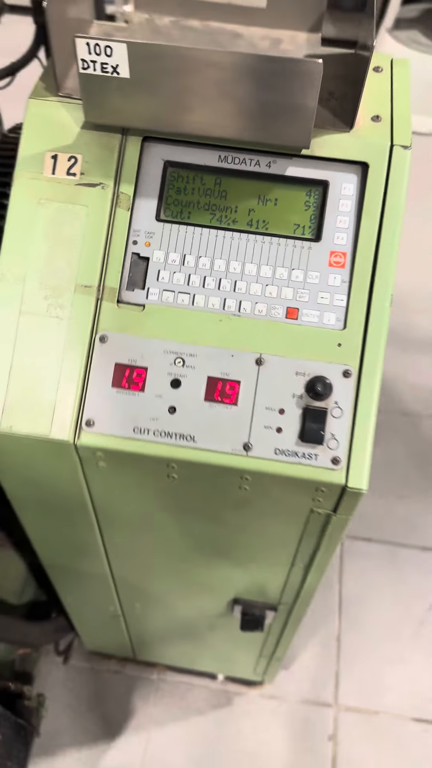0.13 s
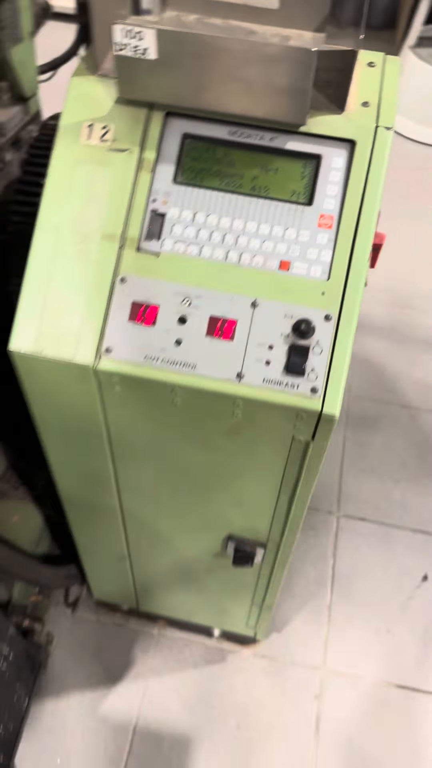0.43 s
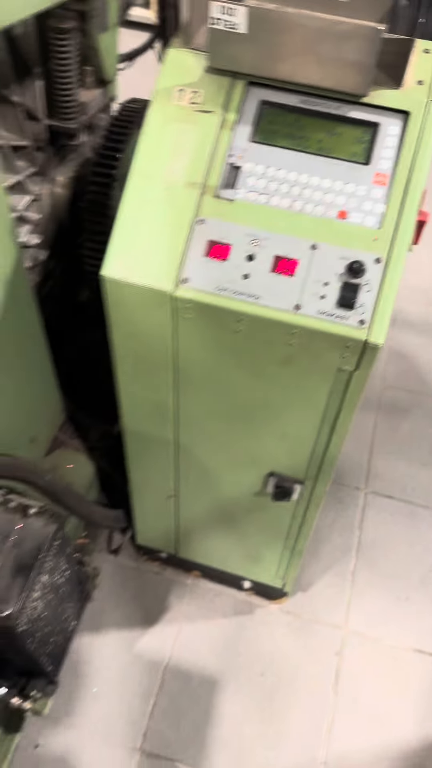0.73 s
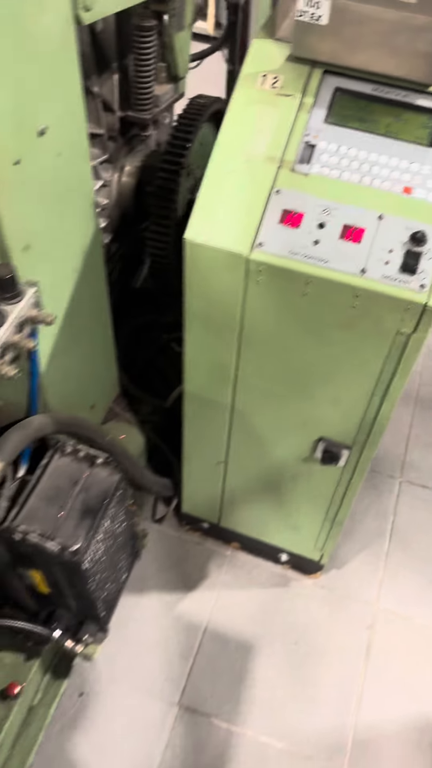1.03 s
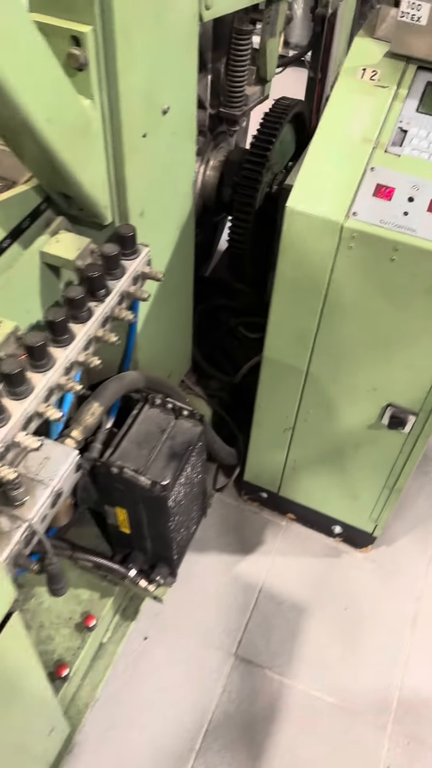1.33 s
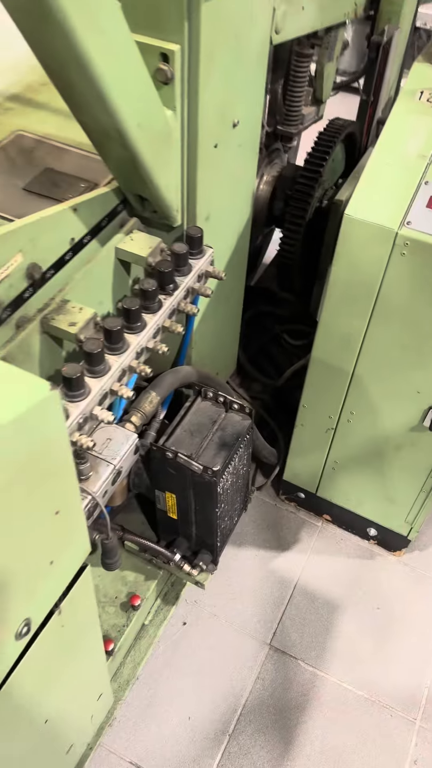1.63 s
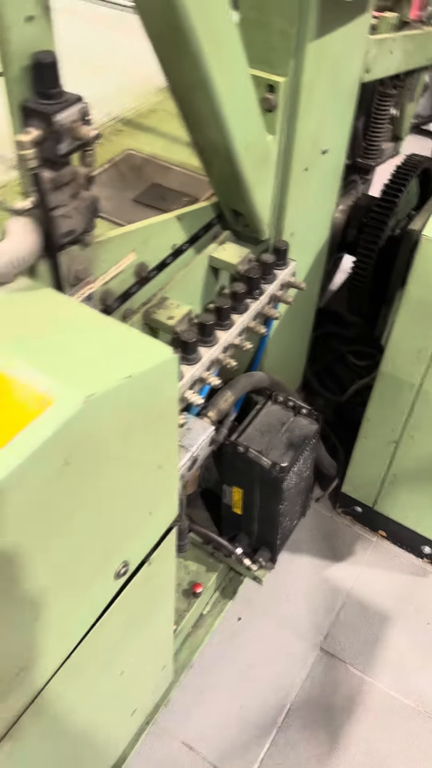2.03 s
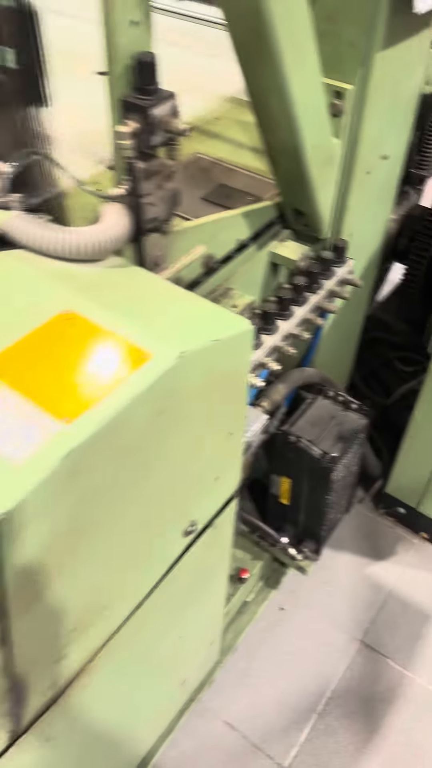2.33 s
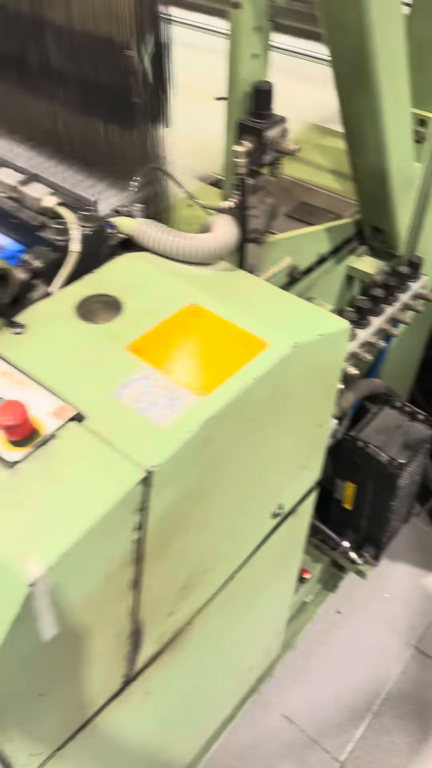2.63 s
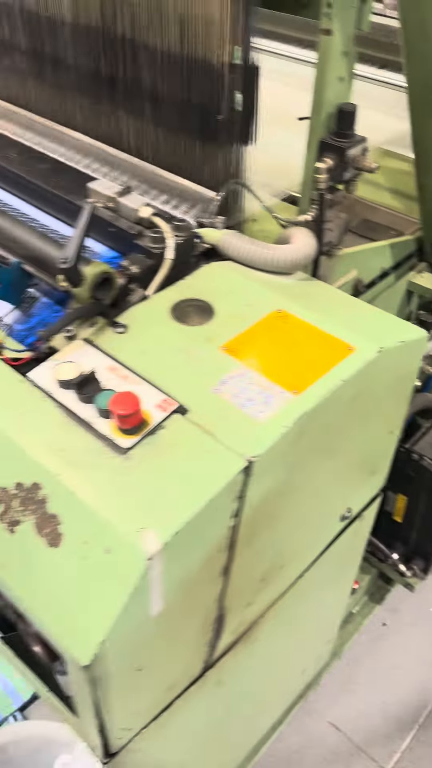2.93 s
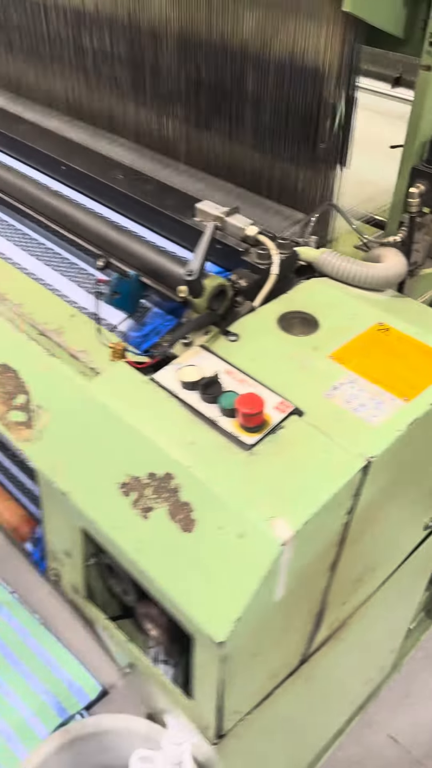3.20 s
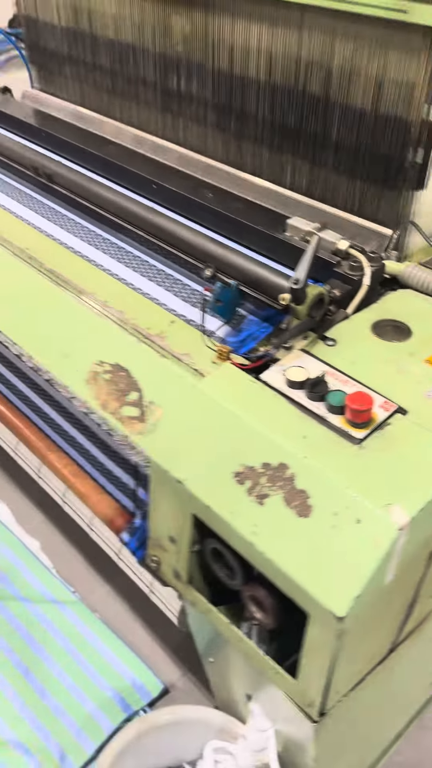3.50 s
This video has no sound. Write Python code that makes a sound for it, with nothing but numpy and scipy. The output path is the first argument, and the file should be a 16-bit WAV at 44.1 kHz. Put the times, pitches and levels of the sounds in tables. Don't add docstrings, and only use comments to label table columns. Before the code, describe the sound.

An air-jet weaving loom beats over ten times a second, each beat a hissing puff and metallic clack, over gear hum and hall noise, heard close on a phone carried past.

```python
import sys
import numpy as np
from scipy import signal
from scipy.fft import rfft, irfft, next_fast_len
from scipy.io import wavfile
from scipy.ndimage import uniform_filter1d, map_coordinates

SR = 44100
rng = np.random.default_rng(int(sys.argv[2]) if len(sys.argv) > 2 else 0)


def generate_wav(signal):
    frames = np.transpose(np.atleast_2d(signal))
    scaled = np.clip(frames, -1, 1) * 32767
    pcm = np.round(scaled).astype(np.int16)
    wavfile.write(sys.argv[1], SR, pcm)


def invert_db(x):
    u = np.asarray(x, float) / 20
    return 10 ** u


N = 161406

PICK_HZ, FIRST_PICK_S = 10.526, 0.001
# time_s, nozzle_db, reed_db
WALK = [(0, -21, -26.5), (.1, -20, -27), (.45, -20, -23.5), (.8, -17, -20.5), (1.2, -14.5, -21),
        (1.5, -16, -21), (1.9, -15, -22.5), (2.2, -17, -22.5), (2.6, -17.5, -23), (2.9, -19, -24),
        (3.3, -19.5, -23), (3.66, -18.5, -26)]

# pitch_hz, level_db
HALL_COLOUR = [(200, -20.5), (600, 3), (1000, -1.5), (2000, -10.5), (4000, -21), (6000, -20.5),
               (10500, -18.5), (15600, -20.5)]
RUMBLE_COLOUR = [(25, -30), (45, 5), (100, -4), (140, 4.5), (220, -2), (330, -1.5), (600, 7), (1200, -33)]
HALL_DB, RUMBLE_DB = -26.5, -28
HALL_FOLLOWS = 0.4

# pitch_hz, level_db
FRAME_COLOUR = [(25, -26), (50, -9.5), (100, -8), (205, -9.5), (240, -1.5), (320, -7.5), (480, -13),
                (1300, -33)]
FRAME_DB = -23.5

TEETH = [42, 108, 16, 78]
# level_db, load_depth (dB per dB), hurry_rad
GEAR_TONES = [(-21.5, 1.1, 1.1), (-34.5, .6, -.8), (-39, .2, .1), (-41, .6, .5)]
# time_s, load_db
CAM_LOAD = [(0, -28.5), (.015, 6), (.033, -22.5), (.052, 4), (.088, 2), (.11, -9.5), (.155, -1), (.18, -1)]
FASTEST_S = 0.068
# time_s, level_db
DRIVE_NEARNESS = [(0, 1), (.6, 1), (1.2, .3), (2, -0.5), (2.8, -1.5), (3.66, -1.4)]

# pitch_hz, level_db
NOZZLE_COLOUR = [(1500, -4), (3500, -2), (5000, 0.5), (5700, 3.5), (9000, 2), (10500, 0.5), (13500, 2),
                 (15700, 2.5)]
BLAST_RISE_S, BLAST_T60_S, BLAST_SCATTER_DB = 0.024, 0.12, 1.3
PICK_JITTER_S = 0.00064

# pitch_hz, level_db
REED_COLOUR = [(500, -35), (900, 2), (1400, -2.5), (2000, -4.5), (3000, -6), (4000, -13), (6000, -7.5)]
CLACK_LATE_S, CLACK_RISE_S, CLACK_T60_S = 0.0063, 0.029, 0.11
RINGING_HZ = [1143, 1313, 1434, 1625, 1802, 2026, 2280, 2755, 3300, 3640]
RING_DB, RING_WIDTH_HZ = -7, 55

# pitch_hz, lead_rad
RIGHT_LEADS_LOW = [(30, 0), (200, 1.2), (400, 3), (650, 3.5), (1200, 4), (1800, 5.5), (3500, 7), (4400, 7)]
RIGHT_LEADS_HIGH = [(4750, 8.6), (5050, 10.2), (5300, 12.1), (6200, 12.57), (8000, 13.6), (10000, 14.75),
                    (11900, 15.7), (15700, 17.4)]
# pitch_hz, likeness (0 to 1)
ALIKE_LOW = [(30, .98), (130, 1), (300, 0.73), (700, 0.82), (1300, 0.62), (2300, 0.075), (3000, 0.082),
             (3900, 0.57)]
ALIKE_HIGH = [(4500, .4), (4950, .5), (5250, .55), (5500, .88), (6500, .88), (8000, .8), (12000, .86),
              (15000, .75)]
# pitch_hz, level_db
LEFT_BALANCE = [(30, 0), (95, -3.5), (170, -11), (230, -13), (400, -3), (1000, -1.5), (3300, 1), (5000, 0)]

# start_s, level_db, sweep_hz
PUFFS = [
    (.1, -20, 900),
    (.19, -19, 900),
    (.2805, -6, 1500),
    (.286, -12, 700),
    (.2935, -8, 120),
    (.3825, -6, 1500),
    (.476, -16, 1000),
]
PUFF_END_HZ, PUFF_FALL_S, PUFF_T60_S, PUFF_RIGHT_DB = 190, 0.002, 0.04, -1

# pitch_hz, level_db
MERGE_LIMIT = [(500, -11.5), (1200, -13), (3000, -13), (3900, -6.5), (5000, -7.5), (5700, -6),
               (10500, -5.6), (13300, -3.2)]
MERGE_EDGES = [16, 24, 32, 40, 48, 64, 80, 96, 120, 144, 160, 176, 196, 216, 240, 264, 292, *range(320, 800, 32)]
SHARP_BLOWS = [.7, 1.33, 1.9, 1.99, 2.01, 2.26, 2.97, 3.0, 3.02, 3.21, 3.62]
LOUD_KEEPS, MERGE_LUCK_DB = 0.19, 0.8
LOW_CUT_HZ, TOP_HZ = 40, 15750


def unit(x):
    return x / np.sqrt(np.mean(x ** 2) + 1e-20)


def along(points, hz):
    f, v = np.transpose(points)
    return np.interp(np.log(hz + 1), np.log(f + 1), v)


def walk():
    s, *levels = np.transpose(WALK)
    return [np.interp(np.arange(N) / SR, s, level) for level in levels]


def wobble(rate):
    knots = rng.standard_normal(int(N * rate / SR) + 4)
    return map_coordinates(knots, [np.arange(N) * rate / SR])


def filtered(x, response):
    m = next_fast_len(N + 8192)
    return irfft(rfft(x, m) * response(np.fft.rfftfreq(m, 1 / SR)), m)[..., :N]


def rush(colour, patchy_db):
    z = signal.stft(rng.standard_normal((2, N)), nperseg=512)[2]
    patches = uniform_filter1d(rng.standard_normal(z.shape[1:]), size=6, axis=0)
    patches = uniform_filter1d(patches, size=4, axis=1)
    pair = signal.istft(z * invert_db(patchy_db * unit(patches)), nperseg=512)[1][:, :N]
    return unit(filtered(pair, lambda hz: invert_db(along(colour, hz))))


def per_pick(late_s, rise_s, t60_s, scatter_db):
    count = int(N / SR * PICK_HZ) + 2
    luck = rng.standard_normal((count, 2))
    peaks = FIRST_PICK_S + late_s + np.arange(count) / PICK_HZ + PICK_JITTER_S * luck[:, 0]
    t = np.arange(N) / SR - peaks[:, None]
    rise = np.sin(np.pi / 2 * np.clip(1 + t / rise_s, 0, 1)) ** 1.1
    fall = invert_db(scatter_db * luck[:, 1:] - 60 * np.clip(t, 0, 1) / t60_s)
    return np.sqrt(np.sum((rise * fall) ** 2, axis=0))


def hall():
    hiss = invert_db(HALL_DB + 0.39 * wobble(2.8)) * rush(HALL_COLOUR, patchy_db=2.3)
    return hiss + invert_db(RUMBLE_DB) * rush(RUMBLE_COLOUR, patchy_db=3.5)


def frame():
    place = np.arange(N) * PICK_HZ / 2 / SR % 1 * 8192
    grid = np.arange(8193)
    patterns = rng.standard_normal((2, 3, 8193))
    drift = np.arange(N) / N * 1.65 + 0.41 * wobble(3.31)
    shake = []
    for first, second, _ in patterns:
        early = np.interp(place, grid, first) * np.cos(drift)
        late = np.interp(place, grid, second) * np.sin(drift)
        shake.append(early + late)
    return invert_db(FRAME_DB) * unit(filtered(np.array(shake), lambda hz: invert_db(along(FRAME_COLOUR, hz))))


def gears():
    t = np.arange(N) / SR
    load_db = uniform_filter1d(np.interp(t, *np.transpose(CAM_LOAD), period=2 / PICK_HZ), size=300)
    hurry = np.sin(np.pi * PICK_HZ * (t - FASTEST_S))
    pair = np.zeros((2, N))
    for path in pair:
        for teeth, (db, depth, hurry_rad) in zip(TEETH, GEAR_TONES):
            level_db = db + depth * load_db + 0.69 * wobble(3.86) + 0.8 * wobble(25)
            phase = np.pi * PICK_HZ * teeth * t + hurry_rad * hurry
            phase = phase + 0.27 * wobble(2.26) + 0.32 * wobble(15) + 6 * rng.random()
            path += invert_db(level_db) * np.sin(phase)
    return np.sqrt(2) * pair


def nozzles():
    flutter = invert_db(1.26 * wobble(400) + 0.91 * wobble(90))
    blasts = per_pick(0, BLAST_RISE_S, BLAST_T60_S, BLAST_SCATTER_DB)
    return invert_db(walk()[0]) * blasts * flutter * rush(NOZZLE_COLOUR, patchy_db=2.0)


def reed():
    rattle = invert_db(1.92 * wobble(250))
    clacks = per_pick(CLACK_LATE_S, CLACK_RISE_S, CLACK_T60_S, 0.64)
    clatter = clacks * rattle * rush(REED_COLOUR, patchy_db=2.0)

    def resonances(hz):
        total = 0
        for k, centre in enumerate(RINGING_HZ):
            damping = 1j * hz * RING_WIDTH_HZ
            total = total + (-1) ** k * damping / (centre * centre - hz * hz + damping)
        return total

    ring = unit(filtered(clatter, resonances)) * clatter.std()
    return invert_db(walk()[1] + 0.32) * (clatter + invert_db(RING_DB) * ring)


def ports(pair):
    def mix(hz):
        angle = np.arccos(np.clip(along(ALIKE_LOW + ALIKE_HIGH, hz), 0, 1)) / 2
        return np.array([np.cos(angle), np.sin(angle)])

    def lag_and_balance(hz):
        lead = np.exp(0.5j * along(RIGHT_LEADS_LOW + RIGHT_LEADS_HIGH, hz))
        return np.array([invert_db(along(LEFT_BALANCE, hz)) / lead, lead])

    direct, scattered = filtered(pair, mix)
    return filtered(np.array([direct + scattered, direct - scattered]), lag_and_balance)


def puffs():
    out, t = np.zeros(N), np.arange(2000) / SR
    for start_s, db, sweep_hz in PUFFS:
        turns = PUFF_END_HZ * t + sweep_hz * PUFF_FALL_S * (1 - np.exp(-t / PUFF_FALL_S))
        rough = 1 + 0.6 * uniform_filter1d(rng.standard_normal(len(t)), size=9)
        swell = invert_db(db - 60 * t / PUFF_T60_S) * (1 - np.exp(-t * 2000))
        out[round(start_s * SR):][:len(t)] += swell * rough * np.sin(2 * np.pi * turns)
    return np.array([out, -invert_db(PUFF_RIGHT_DB) * out])


def scene():
    near_db = walk()[1]
    nearness = invert_db(np.interp(np.arange(N) / SR, *np.transpose(DRIVE_NEARNESS)))
    drive = nearness * (frame() + gears())
    around = invert_db(HALL_FOLLOWS * (near_db - near_db.mean())) * hall()
    return ports(around + drive + nozzles() + reed()) + puffs()


def merged(x):
    lead_in = 944
    window = np.sin(np.pi * (np.arange(2048) + 0.5) / 2048)
    pair = np.array([x[0] + x[1], x[0] - x[1]]) / 2
    pair = np.pad(pair, ((0, 0), (lead_in, 0)))
    hz, t, z = signal.stft(pair, SR, window=window, nperseg=2048)
    band = np.searchsorted(MERGE_EDGES, np.arange(len(hz)), side="right")
    power = (band == band[:, None]) @ abs(z) ** 2
    from_blow_s = np.min(abs(t - lead_in / SR - np.array(SHARP_BLOWS)[:, None]), axis=0)
    sharp = from_blow_s < 512 / SR
    loud_db = 10 * np.log10(power[:, band > 20].sum(axis=(0, 1)) + 1e-12)
    luck_db = MERGE_LUCK_DB * rng.standard_normal((band.max() + 1, len(t)))[band]
    limit_db = along(MERGE_LIMIT, hz)[:, None] - LOUD_KEEPS * (loud_db - np.median(loud_db)) + luck_db
    near_enough = power >= invert_db(2 * limit_db) * power[::-1]
    keep = near_enough | (power >= power[::-1]) | sharp
    mid, side = signal.istft(z * keep, SR, window=window, nperseg=2048)[1][:, lead_in:lead_in + N]
    return np.array([mid + side, mid - side])


def band_limit(x):
    return signal.sosfilt(signal.butter(12, 17130, fs=SR, output="sos"), x)


def record(dry):
    def band_limits(hz):
        return (hz < TOP_HZ) / np.sqrt(1 + (LOW_CUT_HZ / (hz + 1)) ** 6)

    mix = merged(filtered(dry, band_limits))
    return band_limit(mix)


dry = scene()
out = record(dry)
generate_wav(out)
```